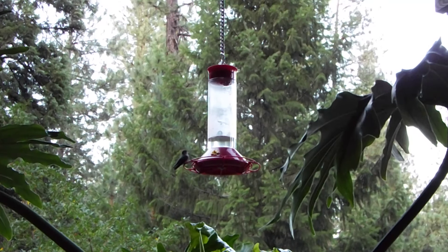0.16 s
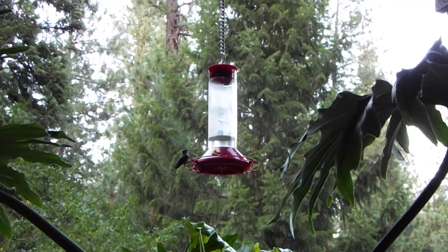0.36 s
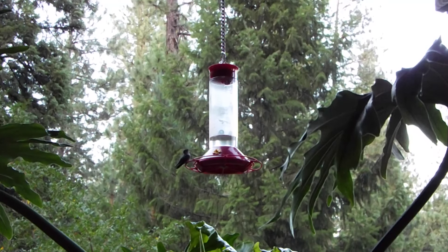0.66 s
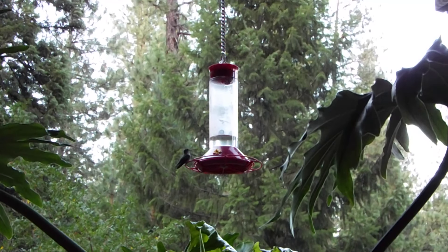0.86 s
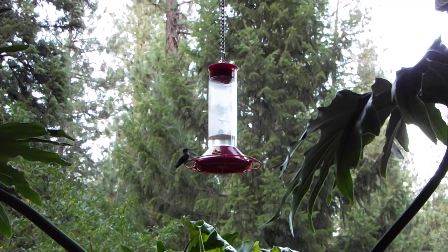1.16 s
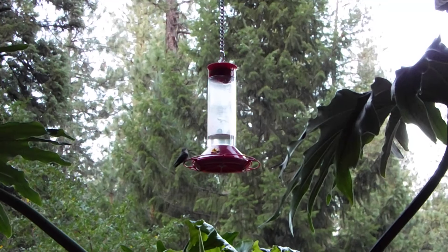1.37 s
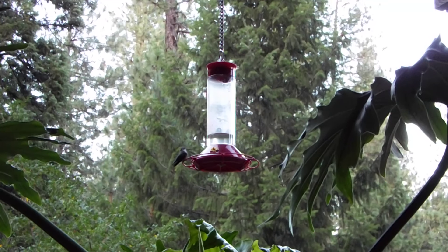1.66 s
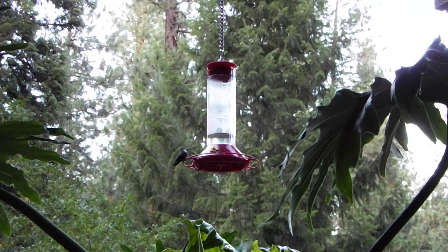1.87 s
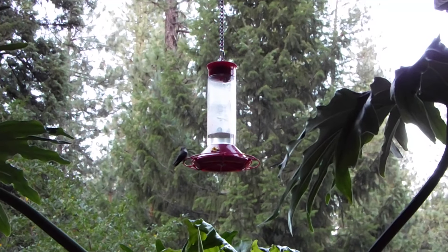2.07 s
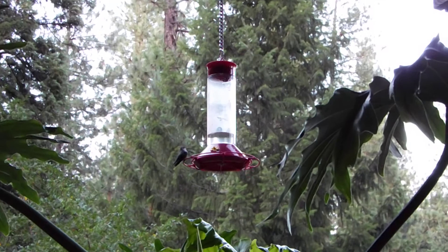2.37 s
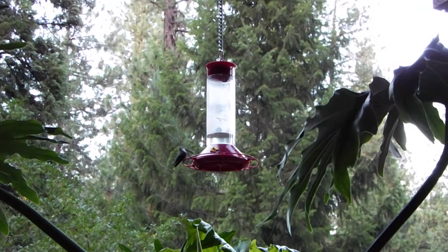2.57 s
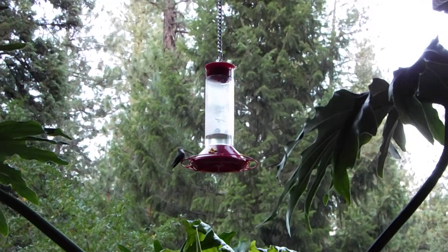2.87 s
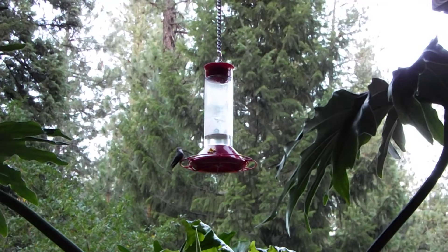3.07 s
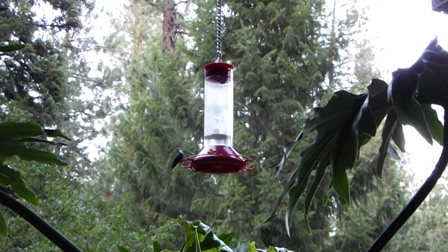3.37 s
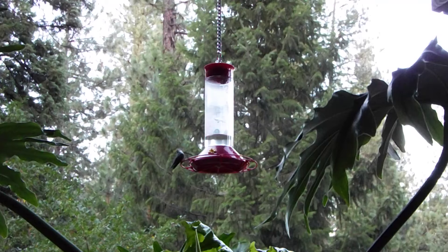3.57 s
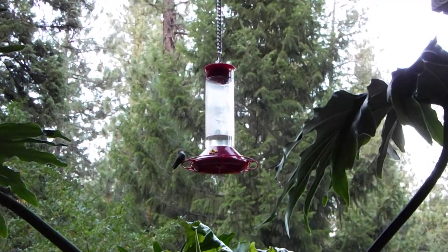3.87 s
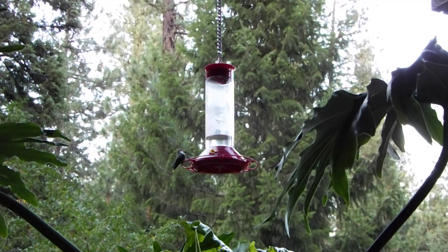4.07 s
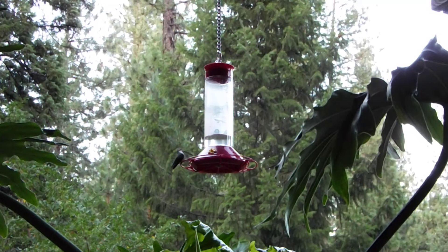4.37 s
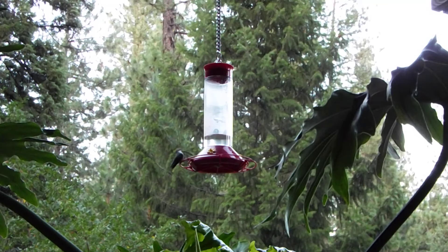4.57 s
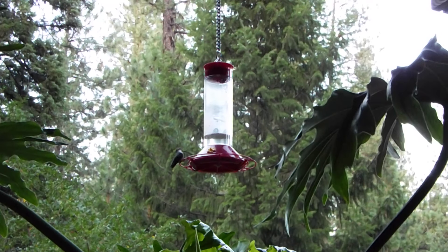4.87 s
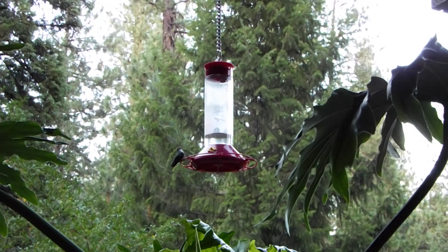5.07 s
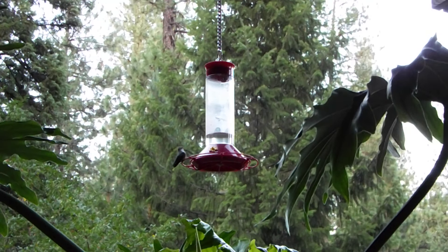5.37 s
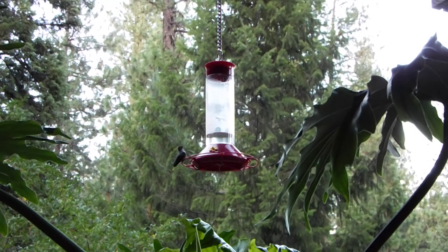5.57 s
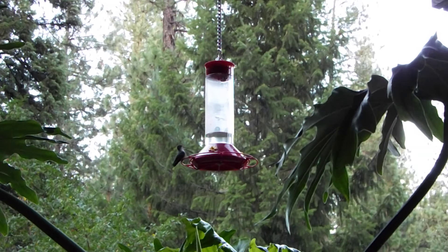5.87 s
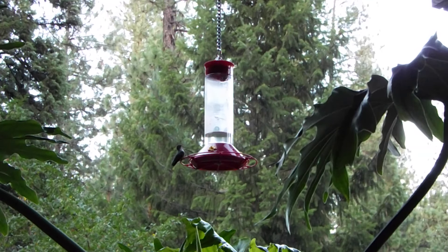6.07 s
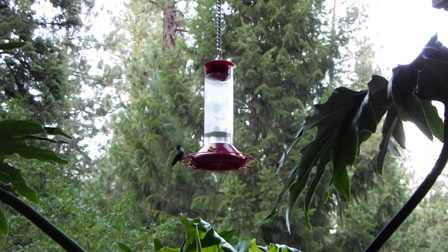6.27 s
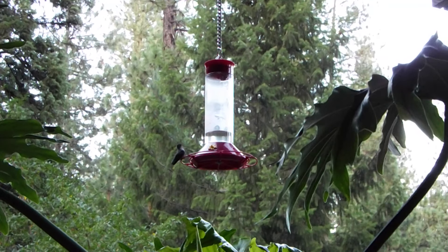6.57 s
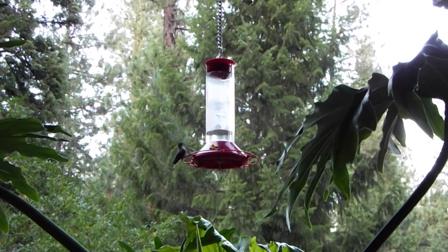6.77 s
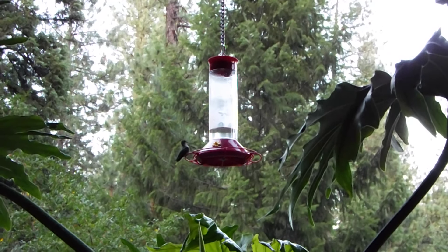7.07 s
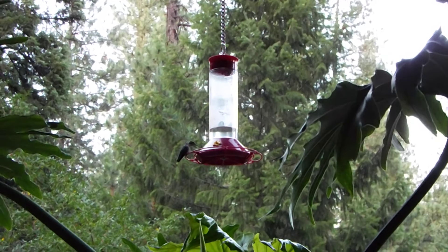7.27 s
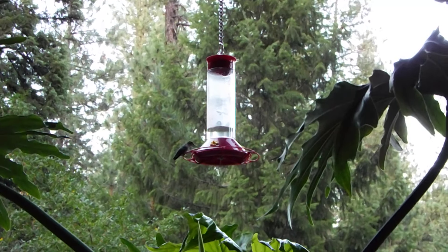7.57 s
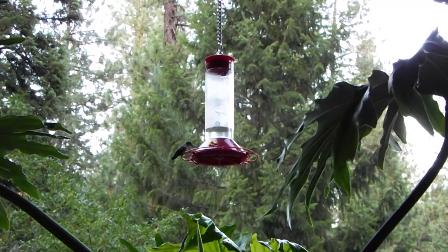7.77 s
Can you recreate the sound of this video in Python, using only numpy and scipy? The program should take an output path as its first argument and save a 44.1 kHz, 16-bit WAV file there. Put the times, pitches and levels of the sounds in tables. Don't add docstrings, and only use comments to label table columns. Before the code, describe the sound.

A quiet wooded yard: soft, uneven low rumble under steady faint microphone hiss. A small bird chips at 0.2 s, with a faint high peep near 0.9. Around 1.2 a thin arched whistle comes with a tick and chips; more chips follow, then a very quick high-low-high warble at 1.75. Near 2.1 a burr, rasp, clicks and a light knock cluster; a dull knock at 2.4 leads straight into a distant hollow wooden door bang at 2.5, echoing from walls and trees. Chips resume, then buzzy burrs crowd 3.6-3.9, followed by churrs and rasps to 4.7. Faint far peeps sound near 4.9. Chips, ticks and arched whistles mark 5.3-6.7, loudest at 6.35. The door bangs again at 6.74, harder, with a low settling knock at 7.0. Rasps and a churr lead to five hoarse scolds from 7.5 and a small low peep at the end.

```python
import sys
import numpy as np
from scipy import signal
from scipy.fft import rfft, irfft, next_fast_len
from scipy.io import wavfile
from scipy.ndimage import uniform_filter1d

SR = 44100
rng = np.random.default_rng(int(sys.argv[2]) if len(sys.argv) > 2 else 0)


def log_audio(samples):
    frames = np.atleast_2d(samples).T
    limited = np.clip(frames, -1, 1)
    pcm = np.round(limited * 32767).astype(np.int16)
    wavfile.write(sys.argv[1], SR, pcm)


def magnitude_from_level(level_db):
    exponent = np.asarray(level_db, float) / 20
    return 10 ** exponent


N = 349713


def unit(x):
    return x / np.sqrt(np.mean(x ** 2))


def coloured(spectrum, size, top_hz=29800.0):
    hz, db = np.transpose(spectrum)
    f = np.arange(1, size // 2 + 2) * SR / size
    bins = rfft(rng.standard_normal(size)) * magnitude_from_level(np.interp(np.log(f), np.log(hz), db))
    low = 1 / (1 + (f / top_hz) ** 2)
    scale = np.std(irfft(bins, size))
    return irfft(bins * low, size) / scale, irfft(bins * (1 - low), size) / scale


def wobble(size, hz):
    k = max(int(SR / hz), 2)
    noise = rng.standard_normal((size // 16384 + 1) * 16384)
    return unit(uniform_filter1d(uniform_filter1d(noise, k), k))[:size]


def decay(t, t60):
    return np.exp(-np.log(1000) * t / t60)


def add(out, s, x, pan_db):
    i = int(s * SR)
    x = np.atleast_2d(x)[:, :N - i]
    out[:, i:i + x.shape[1]] += x * magnitude_from_level(np.array([[pan_db], [-pan_db]]) / 2)


def colour(spectrum, hz):
    f, db = np.transpose(spectrum)
    return np.interp(np.log(hz), np.log(f), db)


def yard():
    # (frequency [Hz], density [dB per Hz])
    middle_spectrum = [(12, -30), (20, -0.5), (53, -2.5), (149, -7), (261, -9), (375, -13.5), (510, -15.5),
                       (603, -17), (1280, -23), (1900, -25.5), (2510, -27.5), (15800, -35)]
    # (frequency [Hz], density [dB per Hz])
    side_spectrum = [(12, -24), (20, 2), (81, -7), (137, -8.5), (345, -14.5), (603, -19), (820, -22.5),
                     (8320, -35), (13800, -34.5), (15800, -50)]
    size = next_fast_len(N, True)
    swell = magnitude_from_level(1.8 * wobble(size, 25))
    mid_rumble, mid_hiss = coloured(middle_spectrum, size, top_hz=610.0)
    side_rumble, side_hiss = coloured(side_spectrum, size, top_hz=610.0)
    mid = magnitude_from_level(-55.5) * (mid_rumble * swell + mid_hiss)
    side = magnitude_from_level(-58.5) * (side_rumble * swell + side_hiss)
    return np.array([mid + side, mid - side])[:, :N]


def trees(x):
    trees_t60_s, near_t60_s = 0.3, 0.1
    wall_s, wall_db, wall_smear_s = 0.0357, 0, 0.0033
    t = np.arange(SR // 2) / SR
    fade = decay(t, trees_t60_s) + 1.3 * decay(t, near_t60_s)
    fade = fade * np.minimum(t / 0.008, 1)
    fade = fade * (1 + magnitude_from_level(wall_db) * np.exp(-((t - wall_s) / wall_smear_s) ** 2))
    both, left, right = rng.standard_normal((3, len(t))) * fade
    returns = np.array([both + 1.1 * left, both + 1.1 * right])
    returns /= np.sqrt(np.sum(returns ** 2) / 2)
    return signal.fftconvolve(x, returns, axes=1)[:, :N]


def ticks():
    # (time [s], level [dB], centre [Hz], decay time [s])
    twigs = [(1.159, -53, 2200, 0.0064), (1.700, -60, 4500, .004), (1.709, -56, 5540, 0.0042),
             (2.007, -57, 6000, 0.0053), (2.134, -43, 3170, 0.0045), (4.498, -49.5, 2000, 0.0022),
             (5.307, -52.5, 2000, 0.0062), (5.612, -50.5, 4500, 0.0038), (5.304, -54, 10500, 0.0069),
             (5.99, -48, 3040, 0.0044), (6.313, -53, 2180, 0.0061), (6.346, -51, 2500, .003),
             (6.733, -48, 2300, .006), (7.651, -57, 5000, .003)]
    # (time [s], level [dB], centre [Hz], decay time [s])
    beaks = [
        (6.676, -45, 5000, 0.0051),
        (1.841, -58, 7000, .004),
        (1.7, -56, 3500, .006),
        (2.078, -52.5, 3500, 0.0088),
    ]
    out = np.zeros((2, N))
    t = np.arange(2000) / SR
    for snaps, below, above in ((twigs, 2.3, 1.67), (beaks, 1.35, 1.3)):
        for s, db, hz, length in snaps:
            band = signal.butter(2, [hz / below, hz * above], "bandpass", fs=SR, output="sos")
            snap = unit(signal.sosfilt(band, rng.standard_normal(len(t))))
            add(out, s, magnitude_from_level(db) * snap * np.exp(-t / length), -1.5)
    return out


def tilted(spectrum, tilt_db):
    return [(f, g + tilt_db * np.log2(f / 200)) for f, g in spectrum]


def door_blow(t, latch, tilt_db, ring_db, factor, crack_db):
    # (frequency [Hz], density [dB per Hz])
    slam_spectrum = [(18, -40), (30, -2), (130, -9.5), (196, -4), (288, -9.5), (413, -4.5), (640, -12),
                     (1100, -17.5), (2500, -32.5), (4880, -25.5), (14000, -90)]
    # (frequency [Hz], density [dB per Hz])
    crack_spectrum = [(150, -36), (400, 0), (700, 1), (1100, 4), (1500, -2.5), (2500, -9.5), (4200, -7.5),
                      (6000, -39), (9000, -63)]
    # (frequency [Hz], level [dB], fall by 60 dB [s])
    panel_modes = [(77.4, 3.5, 0.35), (163.5, -1, 1), (187, 11, 0.39), (294, -6.5, 0.53), (340, 0.5, 0.45),
                   (405, -7.5, 0.41), (542, -18, 0.66), (988, -3, 0.47), (1075, -4, 0.26)]
    crack = coloured(tilted(crack_spectrum, tilt_db), len(t))[0]
    thump, rattle = coloured(tilted(slam_spectrum, tilt_db), len(t), top_hz=930.0)
    clatter = (thump + rattle * latch) * decay(t, 0.55)
    clatter = clatter + magnitude_from_level(crack_db) * crack * decay(t, 0.21) * latch
    lumps = magnitude_from_level(1.6 * wobble(len(t), 200))
    ring = sum(magnitude_from_level(g) * np.sin(2 * np.pi * f * factor * t) * decay(t, t60) for f, g, t60 in panel_modes)
    return (clatter * lumps + magnitude_from_level(-7.5 + ring_db) * ring) * np.minimum(t / 0.005, 1)


def door_echo(t, latch, tilt_db):
    # (frequency [Hz], density [dB per Hz])
    echo_spectrum = [(18, -30), (30, 9), (60, -13), (109, -11.5), (177, 0), (260, -8.5), (592, -10),
                     (747, -10), (1420, -10.5), (2700, -17.5), (3970, -12), (6150, -17), (7170, -25),
                     (14000, -45.5)]
    low, high = coloured(tilted(echo_spectrum, tilt_db), len(t), top_hz=2000.0)
    treble = high * decay(t, 1.25) * (1 - np.exp(-t / 0.012))
    rise = magnitude_from_level(-6.5) * latch * (1 - np.exp(-t / 0.004))
    return rise * (low * decay(t, 2.3) + treble)


def door():
    # (time [s], level [dB], panel ring [dB], pitch factor of the ring [ratio], crack [dB])
    bangs = [
        (2.483, -32, 0.5, 0.97, -2.5),
        (6.741, -32.5, 0.5, .99, 3.5),
    ]
    # (time [s], level [dB], brightness [dB per octave], panel ring [dB], pitch factor [ratio])
    knocks = [
        (2.098, -51, 0.5, 2, 1.36),
        (2.400, -47, -7.5, -11, 0.99),
        (7.015, -56.5, -4, 8.5, 0.31),
    ]
    out = np.zeros((2, N))
    t = np.arange(1 << 16) / SR
    latch = np.clip((t - 0.004) / 0.008, 0, 1)
    treble = signal.butter(1, 2500, "high", fs=SR, output="sos")
    blows = [(s, db, 0.44, *rest) for s, db, *rest in bangs]
    blows += [(*knock, -7 + 3.9 * knock[2]) for knock in knocks]
    for s, db, tilt_db, ring_db, factor, crack_db in blows:
        near = door_blow(t, latch, tilt_db, ring_db, factor, crack_db)
        echo, wide = door_echo(t, latch, tilt_db), door_echo(t, latch, tilt_db)
        middle = near + echo
        side = magnitude_from_level(-28.5) * wide - magnitude_from_level(-12.5) * signal.sosfilt(treble, middle)
        add(out, s, magnitude_from_level(db) * np.array([middle + side, middle - side]), -0.3)
    return out


def sing(out, s, hz, level_db, octave_db, flutter):
    phase = 2 * np.pi * np.cumsum(hz * (1 + flutter * wobble(len(hz), 490))) / SR
    gain = magnitude_from_level(level_db + 1.7 * wobble(len(hz), 420)) * signal.windows.tukey(len(hz), 0.15)
    octave_db = octave_db + 2.5 * wobble(len(hz), 200)
    add(out, s, np.sqrt(2) * gain * (np.sin(phase) + magnitude_from_level(octave_db) * np.sin(2 * phase)), -5)


def peeps():
    # (time [s], length [s], pitch [Hz], level [dB])
    close = [
        (5.611, 0.01, 1885, -56),
        (5.923, 0.015, 2940, -49.5),
        (7.762, 0.045, 1068, -56),
    ]
    # (time [s], length [s], pitch [Hz], level [dB])
    far = [
        (.86, 0.13, 4600, -72),
        (4.86, 0.3, 2640, -72),
        (4.88, 0.21, 1700, -72),
    ]
    out = np.zeros((2, N))
    for notes, flutter in ((close, 0.012), (far, 0.035)):
        for s, length, hz, db in notes:
            u = np.arange(0, 1, 1 / (length * SR))
            swell_db = np.interp(u, [0, 0.32, 1], [-13, 0, -18])
            sing(out, s, hz + 0 * u, db + swell_db, -17, flutter)
    return out


def warble():
    # (time [s], pitch [Hz], level [dB])
    phrase = [
        (1.721, 3900, -59),
        (1.736, 4100, -62),
        (1.747, 3840, -56),
        (1.751, 2930, -69),
        (1.764, 2694, -55.5),
        (1.772, 2920, -57),
        (1.777, 3730, -65),
        (1.785, 4470, -58),
        (1.80, 4150, -66),
    ]
    # (pitch [Hz], level [dB])
    octave = [(3000, -6), (3600, -16)]
    out = np.zeros((2, N))
    s, hz, db = np.transpose(phrase)
    t = np.arange(s.min(), s.max(), 1 / SR)
    pitch = uniform_filter1d(np.interp(t, s, hz), size=150)
    sing(out, t[0], pitch, np.interp(t, s, db), colour(octave, pitch), 0.022)
    return out


def arches():
    # (top of the arch [s], rise [s], fall [s], top pitch [Hz], level [dB])
    arched_notes = [
        (1.161, .024, 0.018, 5950, -46.5),
        (5.315, 0.021, 0.0145, 4390, -45),
        (5.963, 0.036, 0.038, 5660, -46),
        (6.352, 0.027, 0.02, 5720, -41),
        (6.703, 0.033, 0.033, 5810, -43.5),
    ]
    # (frequency [Hz], gain [dB])
    throat = [(3400, -11), (4300, -15.5), (5000, -10), (5700, -2.5), (7000, 15), (8100, -7.5), (9600, -20),
              (11500, -9)]
    start_hz, sag = 3540, 0.747
    rise_power, fall_power = 2.4, 2.15
    out = np.zeros((2, N))
    for s, rise, fall, hz, db in arched_notes:
        t = np.arange(-rise, fall, 1 / SR)
        climb = np.abs(t / rise) ** rise_power
        drop = sag * np.abs(t / fall) ** fall_power
        pitch = hz - (hz - start_hz) * np.where(t < 0, climb, drop)
        tone_db = colour(throat, pitch)
        level_db = db + tone_db - 0.5 * np.maximum(t / fall, 0)
        octave_db = -9.5 + colour(throat, 2 * pitch) - tone_db
        flutter = 0.008 * (5800 / hz) ** 4
        sing(out, s - rise, pitch, level_db, octave_db, flutter)
    return out


def nasal(notes, hz, pan_db, voice, upper_db, attack):
    # (frequency [Hz], density [dB per Hz])
    breath_spectrum = [(1500, -22), (2800, -13), (4000, -16.5), (6200, -9.5), (9500, -16.5), (10800, -20),
                       (13000, -42)]
    out = np.zeros((2, N))
    fall, depth, rate, flutter = voice
    *partials_db, breath_db = upper_db
    for s, db, low_db, length in notes:
        u = np.arange(0, length, 1 / SR)
        u = u / u[-1]
        dips = depth * 0.8 * np.abs(wobble(len(u), rate)) ** 1.5
        pitch = hz * (1 - fall * u ** 1.196) * (1 - dips + flutter * wobble(len(u), 2130))
        phase = 2 * np.pi * np.cumsum(pitch) / SR
        stack = sum(magnitude_from_level(g) * np.sin((k + 1) * phase) for k, g in enumerate([low_db, *partials_db]))
        stack = stack + magnitude_from_level(breath_db) * coloured(breath_spectrum, size=16384)[0][:len(u)]
        shape = np.minimum(u / attack, 1) * np.minimum((1 - u) / 0.11, 1)
        gain = magnitude_from_level(db - 10.0 + 0.47 * wobble(len(u), 155))
        add(out, s - 0.004, gain * shape * stack, pan_db)
    return out


def calls():
    # (time [s], level [dB], lowest partial minus level [dB])
    chips = [(.1885, -49.5, -11), (1.171, -52, -3), (1.268, -53.5, -4), (1.544, -47, -8), (1.612, -48, -8),
             (1.708, -60, 3), (2.037, -46, -9), (2.169, -45, -10), (2.421, -67, 12), (2.884, -51.5, 1),
             (3.015, -70, 18), (3.17, -71, 19), (3.261, -47, -5.5), (3.321, -47, -8), (3.425, -64, 7),
             (3.549, -64, 8), (4.019, -49, -7), (4.321, -49, -5), (4.401, -45.5, -9), (4.791, -46.5, -8),
             (5.097, -46.5, -7), (5.4, -46, -8.5), (5.511, -47.5, -8), (5.816, -45.5, -8),
             (5.921, -43, -10), (6.703, -46, -8)]
    # (time [s], level [dB], lowest partial minus level [dB], length [s])
    burrs = [(2.069, -49, -9, 0.026), (3.6, -55, -5, 0.023), (3.634, -50.5, -7, 0.046),
             (3.669, -50, -2, 0.033), (3.709, -47, -7, 0.04), (3.739, -51.5, -5, 0.027),
             (3.789, -48.5, -12, 0.044), (3.819, -56, -2, 0.046), (3.875, -52, -9, 0.034),
             (5.95, -47.5, -26, .066), (6.009, -46.5, -12, 0.034), (6.039, -61, -20, .03)]
    # (time [s], level [dB], lowest partial minus level [dB], length [s])
    rasps = [(2.101, -52, -18, 0.05), (4.099, -57, -11, 0.042), (4.181, -52.5, -5, .049),
             (4.248, -52, -11, 0.047), (4.533, -56.5, -16, 0.039), (4.61, -52.5, -11, 0.058),
             (4.694, -49, -6, 0.03), (6.37, -48, -9, 0.024), (6.799, -50, -13, 0.05),
             (7.049, -52, 1, 0.039), (7.126, -50.5, -4, .038), (7.197, -52, -5, 0.04)]
    # (time [s], level [dB])
    scolds = [
        (7.47, -54.5),
        (7.554, -50.5),
        (7.622, -50.5),
        (7.702, -51.5),
        (7.774, -52.5),
    ]
    # (time [s], level [dB], lowest partial minus level [dB], length [s])
    churrs = [
        (3.918, -54.5, -20, 0.093),
        (4.339, -55.5, -23, .13),
        (6.876, -52.5, -15, 0.092),
        (7.29, -53.5, -10, 0.12),
    ]
    chips = [(*note, 0.028) for note in chips]
    scolds = [(*note, -5.5, 0.0398) for note in scolds]
    return (nasal(chips, hz=2437, pan_db=-3, voice=(0.18, 0.02, 300, 0.014),
                  upper_db=(-11.5, -5, -12.5, -10), attack=0.07)
            + nasal(burrs, hz=2344, pan_db=-2.5, voice=(0.08, 0.08, 600, 0.018),
                    upper_db=(-10.5, -0.5, -5.5, -18), attack=0.03)
            + nasal(rasps, hz=2354, pan_db=-2, voice=(0.08, 0.07, 900, 0.07),
                    upper_db=(-15, -4, -7.5, -0.5), attack=0.031)
            + nasal(scolds, hz=3156, pan_db=-3, voice=(0.1, 0.06, 900, 0.08),
                    upper_db=(-10, -10, -21, 0), attack=0.07)
            + nasal(churrs, hz=2325, pan_db=-3, voice=(0.02, 0.085, 600, 0.01),
                    upper_db=(-23, 7, -6, -1), attack=0.2))


def scene():
    snaps = ticks()
    whistles = peeps() + warble() + arches()
    nasals = calls()
    wet = trees(magnitude_from_level(-3) * whistles + magnitude_from_level(-1) * nasals + snaps)
    return yard() + door() + snaps + whistles + nasals + wet


def low_pass(x):
    return signal.sosfilt(signal.butter(12, 15760, fs=SR, output="sos"), x)


def record(dry):
    return low_pass(dry)


dry = scene()
out = record(dry)
log_audio(out)
```